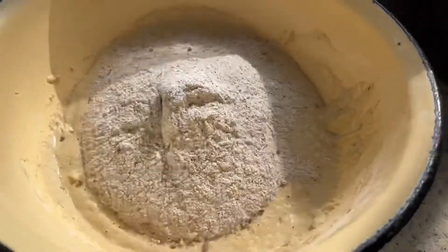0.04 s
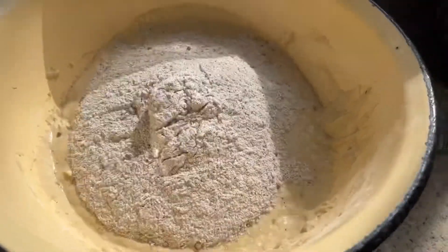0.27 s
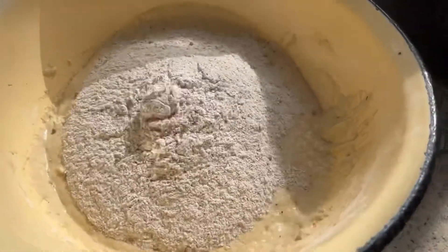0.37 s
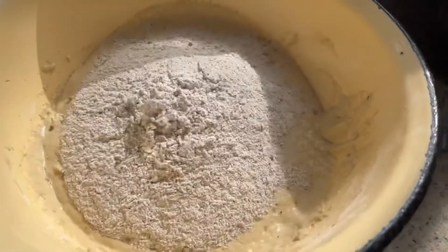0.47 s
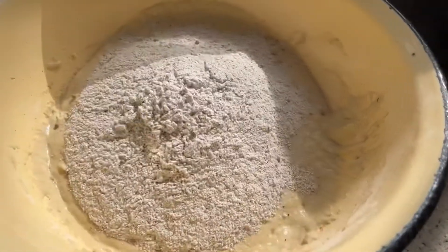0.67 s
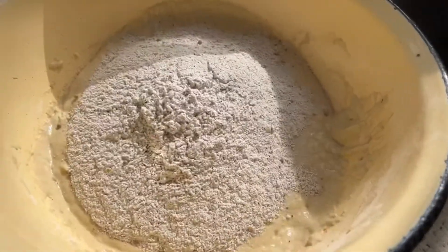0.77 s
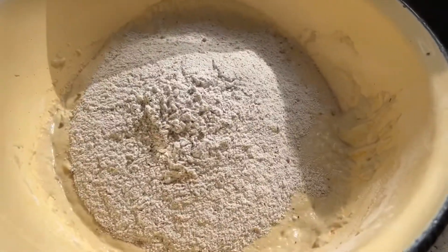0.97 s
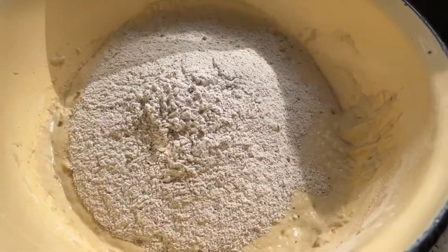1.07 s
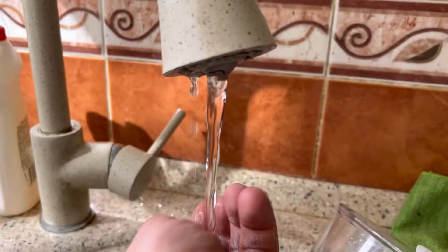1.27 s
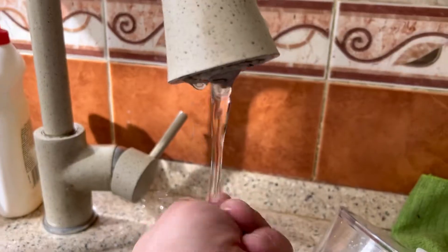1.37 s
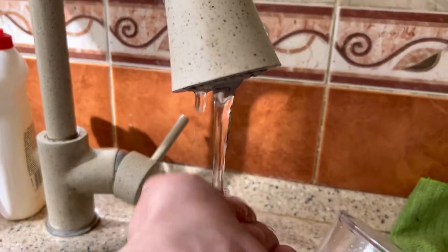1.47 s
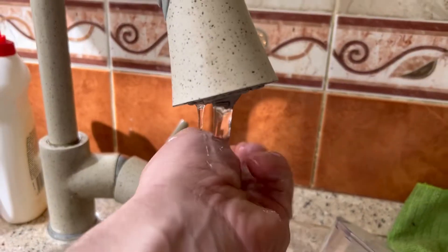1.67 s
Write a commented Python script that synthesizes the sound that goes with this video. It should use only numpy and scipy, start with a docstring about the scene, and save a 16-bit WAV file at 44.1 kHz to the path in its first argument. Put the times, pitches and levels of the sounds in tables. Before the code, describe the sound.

Something solid thuds loudly onto a countertop after a faint patter of grains; faint water follows

```python
"""Something lands on a kitchen counter, close up: a heavy thump, a small second bump, the room ringing out.
Damped sine modes, a dull thud and a crack make each contact; a low boom and a shudder of noise follow.
Before it, dry grains patter onto flour in a bowl: dense tiny ticks over a noise rustle.
After a quiet moment a thin stream from the tap runs over a hand: gliding bubble tones and noise fizz,
noise drums softly in the sink, and short bursts of tones and spray spit. A low room tone lies under it all."""
import sys
import numpy as np
from scipy import signal
from scipy.fft import rfft, irfft, next_fast_len
from scipy.io import wavfile

SR = 44100
rng = np.random.default_rng(int(sys.argv[2]) if len(sys.argv) > 2 else 0)


def wav_record(signal):
    """Record a signal, one row per channel, as 16-bit PCM in the file named by sys.argv[1]."""
    frames = np.transpose(np.atleast_2d(signal))
    bounded = np.clip(frames, -1, 1)
    # unit amplitude maps onto the largest positive 16-bit level
    quanta = np.round(bounded * 32767).astype(np.int16)
    wavfile.write(sys.argv[1], SR, quanta)


N = 74970  # length in samples

# Room tone spectrum: pitch_hz, level_db [Hz, dB]
ROOM_TONE_COLOUR = [(15, -35), (25, -18), (64, 1), (130, -4.5), (260, -7), (340, -12), (591, -27.5),
                    (1040, -32.5), (1840, -39), (2600, -31), (3600, -18.5), (4900, -31.5), (9000, -47.5),
                    (16000, -57)]
# Room decay time: pitch_hz, t60_s [Hz, s]
ROOM_T60 = [(60, 0.49), (300, .48), (1000, 0.44), (3000, .45), (8000, .36), (16000, 0.36)]
# Room reverberation spectrum: pitch_hz, gain_db [Hz, dB]
ROOM_GAIN = [(50, -12.5), (90, -10), (160, -15.5), (330, -15), (600, -13.5), (1100, -5.5), (2500, -9),
             (8000, -9), (16000, -15.5)]
# Left-right likeness of diffuse sound: pitch_hz, likeness [Hz, correlation]
ROOM_ALIKE = [(60, 0.98), (130, 0.79), (290, 0.4), (640, 0.97), (1400, .1), (3000, 0.36), (15000, .1)]
# Left-right likeness of close sound: pitch_hz, likeness [Hz, correlation]
NEAR_ALIKE = [(60, 0.97), (500, 1), (1200, .45), (4000, 0.35), (8000, 0.36), (15000, .15)]

# Fizz of the stream over time: time_s, level_db [s, dB]
FLOW = [(1.23, -61.5), (1.26, -57), (1.29, -65), (1.335, -53), (1.39, -60), (1.44, -49), (1.51, -59.5),
        (1.55, -58.5), (1.59, -54), (1.63, -56), (1.66, -49), (1.7, -63)]
# Fizz spectrum: pitch_hz, level_db [Hz, dB]
FIZZ_COLOUR = [(100, -25), (400, -9), (1100, -4.5), (1900, -1.5), (3400, -6), (6900, -5.5), (8900, 4),
               (10300, -15), (11700, 3), (13800, -13), (15300, -2), (16300, -4.5)]
# Water landing on the sink floor: time_s, level_db [s, dB over DRUM_DB]
DRUM = [(1.53, -22.5), (1.56, 2), (1.6, -2), (1.63, 1.5), (1.7, -3)]
# Sink floor drumming spectrum: pitch_hz, level_db [Hz, dB]
DRUM_COLOUR = [(20, -8.5), (55, 0), (150, -6), (400, -19), (900, -17), (2000, -38.5)]
# Splashes: start_s, level_db, centre_hz, width_octaves, t60_s [s, dB, Hz, octaves, s]
SPLASHES = [(1.231, -55.5, 2444, 0.203, 0.17), (1.2652, -39.5, 8470, .5, 0.014),
            (1.2962, -42, 6270, .25, 0.011), (1.307, -37, 5700, .25, 0.0089),
            (1.3095, -44.5, 15000, .1, .03), (1.316, -49.5, 2456, .2, 0.094),
            (1.3235, -28.5, 6000, .35, 0.013), (1.3326, -32, 6050, .45, 0.028),
            (1.3394, -31, 7470, .3, 0.022), (1.379, -50, 4650, .1, .04), (1.398, -44, 1750, 0.32, 0.027),
            (1.4172, -36.5, 8200, .4, 0.044), (1.444, -34.5, 2897, .8, 0.027),
            (1.48, -44.5, 6860, .12, 0.049), (1.519, -32, 2070, 0.33, .028), (1.559, -47, 914, 0.72, .04),
            (1.5635, -37, 5950, .15, 0.022), (1.5742, -32.5, 5920, .6, 0.04),
            (1.6367, -20.5, 7920, .22, .009), (1.6365, -37.5, 5770, 0.94, .04), (1.637, -43, 942, .5, .05),
            (1.655, -44.5, 2970, 1, .04), (1.6603, -28, 11920, 0.14, 0.016)]

# Falling grains over time: time_s, level_db [s, dB]
POUR = [(0, -54.5), (.01, -48), (.038, -54), (.07, -49), (.1, -44.5), (.124, -55.5), (.18, -51), (.2, -57),
        (.27, -55.5), (.3, -70.5), (.37, -72), (.42, -86), (.52, -73), (.6, -110)]
# Grain spectrum: pitch_hz, level_db [Hz, dB]
POUR_COLOUR = [(100, -17), (250, -6.5), (620, -6.5), (1100, -7.5), (4000, -9.5), (8700, -2), (10300, -14.5),
               (11800, -3.5), (13800, -12.5), (15500, -9)]

# Things on the counter shaking: time_s, level_db [s, dB]
SHUDDER = [(.218, -54), (.24, -22.5), (.29, -33), (.35, -36), (.39, -44.5), (.5, -55), (.65, -76.5),
           (.8, -119)]
# Shudder spectrum: pitch_hz, level_db [Hz, dB]
SHUDDER_COLOUR = [(35, -22), (65, -4.5), (90, 6.5), (130, -0.5), (200, 0.5), (400, 0.5), (700, -0.5),
                  (1100, -7), (1700, -19.5), (2600, -25), (4000, -35.5), (7000, -38), (12000, -59.5)]
# Cupboard booms: start_s, level_db [s, dB]
BOOMS = [(0.2273, -1.5), (.349, -18.5)]
# Contacts with the counter: start_s, ring_db, thud_db, crack_db, dull_above_hz [s, dB, dB, dB, Hz]
KNOCKS = [(.2015, -24.5, -41, -62.5, 900), (0.2146, 1, -15, -28, 6120), (0.27, -20, -39, -38.5, 5900),
          (.3415, -19, -35.5, -81, 700), (1.043, -59, -60.5, -87.5, 1530)]
# Ringing of the counter and the things on it: pitch_hz, level_db, t60_s, swell_s [Hz, dB, s, s]
MODES = [(159, -6.5, .08, 0.0088), (229.8, -11, 0.11, 0.013), (335.3, -6.5, 0.094, 0.0034),
         (541, -8.5, 0.063, 0.003), (590, -3, 0.024, 0.0014), (675, -11.5, 0.073, 0.0011),
         (880, -27.5, 0.069, .001), (1052.4, -27, 0.12, .001), (1055, -51.5, .9, .001),
         (1156, -26, 0.11, .001), (1412, -27.5, 0.087, .001), (1982, -26.5, .045, .001)]
# Thud spectrum: pitch_hz, level_db [Hz, dB]
THUD_COLOUR = [(40, -13), (130, 1.5), (350, -3.5), (600, -1), (850, -6), (1150, -5), (2200, -17),
               (3500, -31), (8000, -49)]
# Crack spectrum: pitch_hz, level_db [Hz, dB]
CRACK_COLOUR = [(1000, -10), (3500, -12.5), (7500, 1.5), (10000, -6.5), (16000, -10)]

TOP_HZ = 16300  # band limit
ROOM_TONE_DB, DRUM_DB = -60.5, -58.5
BASIN_FIRST_S, BASIN_LAST_S, BASIN_DB = 0.0028, .014, -18.5  # reflections around the sink
TAP_ON_S, TAP_RISE_S = 1.224, 0.0094
PLIP_DB = -8.5  # sparse larger bubbles against the fizz bubbles
SPLASH_ATTACK_S = 0.00054
SPRAY_DB = -29  # broad floor under the peak of each splash spectrum
SPLASH_TONE_DB = 0  # ringing bubbles against the burst of noise
BOOM_HZ, BOOM_T60_S, BOOM_SWELL_S = 86, 0.099, 0.0095
THUD_T60_S, CRACK_T60_S = 0.066, 0.018
# The ring leads in phase at the right microphone: radians each side per kHz, and the most it can reach
MODE_TURN_PER_KHZ, MODE_TURN_MAX = 0.72, .55


def amp(db):
    """Decibels to gain."""
    return 10 ** (np.asarray(db) / 20)


def unit(x):
    """Scale to rms 1."""
    return x / np.sqrt(np.mean(x ** 2) + 1e-20)


def along(points, hz):
    """Read a (Hz, value) curve on a log frequency axis."""
    f, v = np.transpose(points)
    return np.interp(np.log(hz + 1), np.log(f + 1), v)


def since(s):
    """Seconds since a moment, zero before it."""
    return np.maximum(np.arange(N) / SR - s, 0)


def level(rows):
    """Gain per sample from a (s, dB) curve."""
    return amp(np.interp(since(0), *np.transpose(rows)))


def strike(s, swell, t60):
    """Envelope that swells over some seconds and decays 60 dB in t60 seconds."""
    t = since(s)
    return (1 - np.exp(-(t / swell) ** 2)) * amp(-60 * t / t60)


def filtered(x, response):
    """Shape the spectrum of x by a response of frequency."""
    m = next_fast_len(N + SR // 2)  # padded against wrap-around
    spectrum = rfft(x, m) * response(np.fft.rfftfreq(m, 1 / SR))
    return irfft(spectrum, m)[..., :N]


def spread(pair, colour, alike):
    """Mix two unrelated signals, as mid and side, into a coloured left and right of given likeness."""
    def mid_side(hz):
        turn = np.arccos(np.clip(along(alike, hz), -1, 1)) / 2
        return amp(along(colour, hz)) * [np.cos(turn), np.sin(turn)]

    mid, side = filtered(pair, mid_side)
    return np.array([mid + side, mid - side])


def noise(colour, alike=NEAR_ALIKE):
    """Coloured stereo noise of rms 1."""
    return unit(spread(rng.standard_normal((2, N)), colour, alike))


def lean(x, left_db):
    """Tilt the balance so that left gains left_db over right."""
    return x * amp([[left_db / 2], [-left_db / 2]])


def grains(rate, hz, octaves, cycles, size_db, glide, size=400):
    """Short damped tones at random times, rate per second; a positive glide raises their pitch."""
    u = rng.random((int(rate * N / SR), 4))
    f = hz * 2 ** (octaves * rng.standard_normal(len(u)))
    f = np.clip(f, 1, SR / 3)[:, None]
    t = np.arange(size) / SR
    age = t * f / cycles
    strength = amp(-size_db * np.log(1 - .97 * u[:, 1:2]))  # many weak, few strong
    phase = 2 * np.pi * f * t * (1 + glide * np.minimum(age, 1))
    wave = strength * np.exp(-3 * age) * np.sin(phase)
    where = ((u[:, :1] * N).astype(int) + np.arange(size)).ravel()
    angle = 2 * np.pi * u[:, 2:3]  # splits each grain between the two channels
    channels = [np.bincount(where, (wave * share).ravel())[:N] for share in (np.cos(angle), np.sin(angle))]
    return unit(np.array(channels))


def room_tone():
    """Steady diffuse noise, mostly low, with a faint hiss."""
    return amp(ROOM_TONE_DB) * noise(ROOM_TONE_COLOUR, ROOM_ALIKE)


def kitchen(x):
    """The tiled room answers: convolution with a noise tail whose frequencies die at their own speeds."""
    hz, t, z = signal.stft(rng.standard_normal((2, N)), SR, nperseg=256)
    t60 = along(ROOM_T60, hz)[:, None]
    decaying = z * amp(-60 * t / t60) / np.sqrt(t60)  # the root evens out the energy of long and short decays
    tail = signal.istft(decaying, SR, nperseg=256)[1][:, :N]
    tail = spread(tail / np.linalg.norm(tail[0]), ROOM_GAIN, ROOM_ALIKE)
    tail = tail * np.minimum(since(.004) / .012, 1)  # fades in after 4 ms, over 12 ms
    return signal.fftconvolve(x, tail, axes=1)[:, :N]


def basin(x, count=7):
    """The sink walls and tiles send back a few quick weak copies, delayed apart for each channel."""
    delays = rng.uniform(BASIN_FIRST_S, BASIN_LAST_S, (count, 2, 1))
    return filtered(x, lambda hz: 1 + amp(BASIN_DB) * np.exp(-2j * np.pi * hz * delays).sum(0))


def stream():
    """Upward-gliding bubble tones and noise fizz on the hand; low noise drums softly in the sink."""
    bubbles = grains(rate=1500, hz=6500, octaves=.8, cycles=19, size_db=4.5, glide=.06)
    plips = grains(rate=220, hz=3207, octaves=.55, cycles=21, size_db=2.5, glide=0.043, size=1200)
    hiss = amp(-4) * rng.standard_normal((2, N))
    fizz = unit(spread(bubbles + amp(PLIP_DB) * plips + hiss, FIZZ_COLOUR, NEAR_ALIKE))
    drum = amp(DRUM_DB) * level(DRUM) * noise(DRUM_COLOUR)
    tap = np.minimum(since(TAP_ON_S) / TAP_RISE_S, 1)
    return tap * (level(FLOW) * fizz + drum)


def splashes(count=3):
    """Drops burst in short spits: a few bubbles ring around one pitch, with a little broad spray."""
    out = np.zeros((2, N))
    grid = np.geomspace(100, SR / 2, 200)
    for s, db, hz, octaves, t60 in SPLASHES:
        shape = np.exp(-(np.log2(grid / hz) / octaves) ** 2 / 2) + amp(SPRAY_DB)
        burst = noise(np.column_stack([grid, 20 * np.log10(shape)]))
        pitches = hz * 2 ** (octaves * rng.uniform(-1, 1, (count, 1, 1)))
        phases = rng.uniform(0, np.pi, (count, 2, 1))
        tones = unit(np.sin(2 * np.pi * pitches * since(s) + phases).sum(0))
        spit = unit(burst + amp(SPLASH_TONE_DB) * tones)
        out += amp(db) * strike(s, SPLASH_ATTACK_S, t60) * spit
    return out


def pour():
    """Dry grains land as dense tiny ticks, heavily damped tones, over a soft noise rustle."""
    ticks = grains(rate=3500, hz=7000, octaves=.8, cycles=1.5, size_db=4.5, glide=0)
    rustle = amp(1) * rng.standard_normal((2, N))
    patter = unit(spread(ticks + rustle, POUR_COLOUR, NEAR_ALIKE))
    return lean(level(POUR) * patter, left_db=1.5)


def shudder():
    """Loose things on the counter shake: diffuse noise that follows a level curve."""
    return level(SHUDDER) * noise(SHUDDER_COLOUR, ROOM_ALIKE)


def booms():
    """The cupboard resonates: a low sine swells and dies away."""
    return sum(amp(db) * strike(s, BOOM_SWELL_S, BOOM_T60_S) * np.sin(2 * np.pi * BOOM_HZ * since(s))
               for s, db in BOOMS)


def counter_ring(s):
    """Contact excites the modes: damped sines, offset in phase between the microphones."""
    ring = np.zeros((2, N))
    for hz, db, t60, swell in MODES:
        turn = min(MODE_TURN_PER_KHZ * hz / 1e3, MODE_TURN_MAX) * np.array([[-1], [1]])
        ring += amp(db) * strike(s, swell, t60) * np.sin(2 * np.pi * hz * since(s) + turn)
    return ring


def knocks():
    """Each contact is modal ring and noise thud through a low-pass, plus a brief bright crack."""
    out = np.zeros((2, N))
    for s, ring_db, thud_db, crack_db, dull_hz in KNOCKS:
        thud = strike(s, 0.00067, THUD_T60_S) * noise(THUD_COLOUR)
        body = amp(ring_db) * counter_ring(s) + amp(thud_db) * thud
        low_pass = signal.butter(2, min(dull_hz, SR / 3), fs=SR, output="sos")
        out += signal.sosfilt(low_pass, body)
        crack = strike(s - .001, 0.0001, CRACK_T60_S) * noise(CRACK_COLOUR)  # 1 ms ahead of the body
        out += amp(crack_db) * crack
    return out


def thump():
    """The contacts, the cupboard booms and the shudder together, a little to the left."""
    return lean(shudder() + knocks() + booms(), left_db=1.5)


def scene():
    """Counter sounds and water, direct and through the room, over the room tone."""
    counter = pour() + thump()
    water = lean(basin(stream() + splashes()), left_db=2.5)
    room = kitchen(counter + amp(-5.5) * water)  # the water feeds the room less
    return counter + water + room + room_tone()


def record(dry):
    """Nothing is kept above the band limit."""
    return filtered(dry, lambda hz: hz < TOP_HZ)


dry = scene()
out = record(dry)
wav_record(out)
```